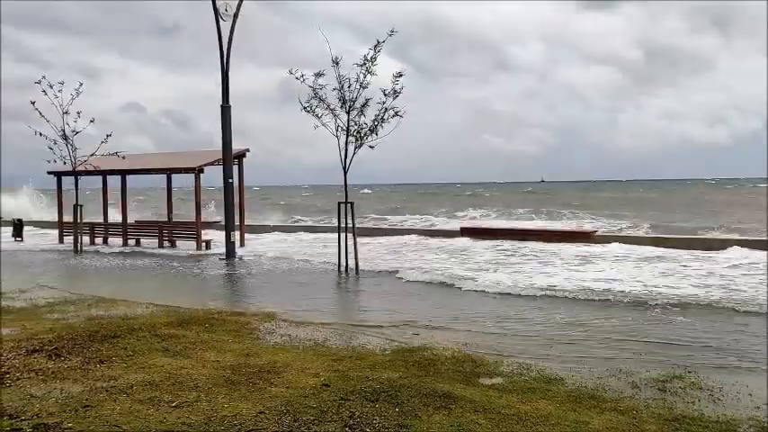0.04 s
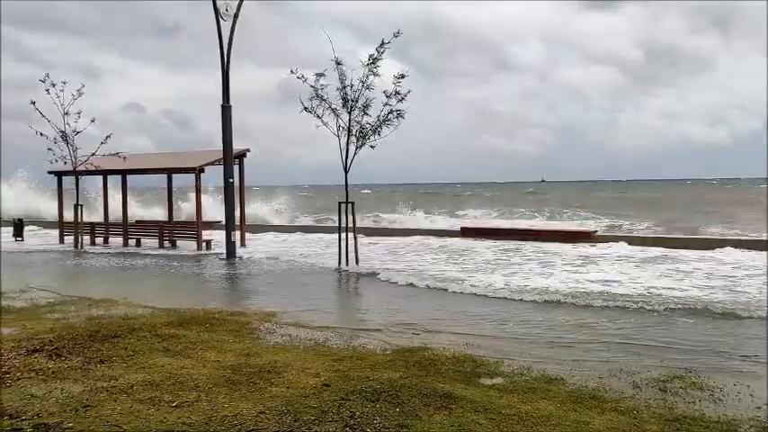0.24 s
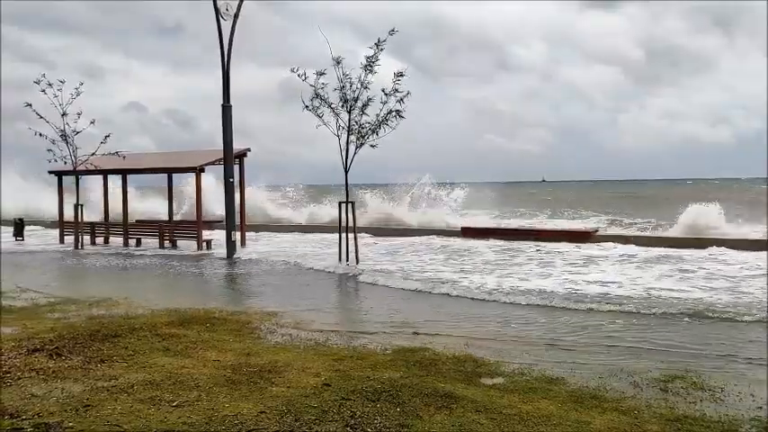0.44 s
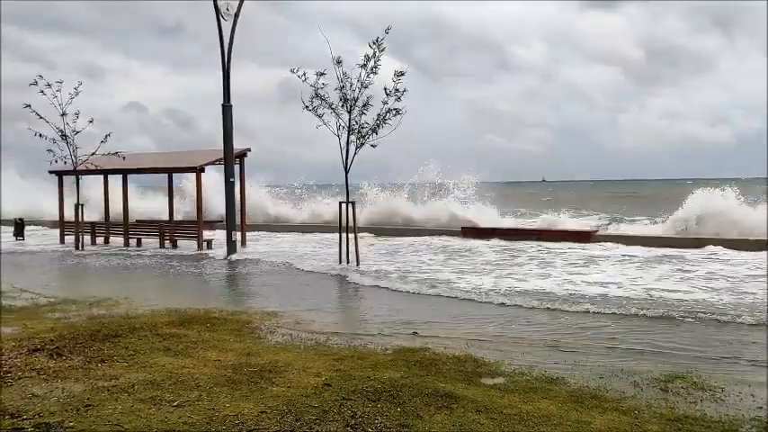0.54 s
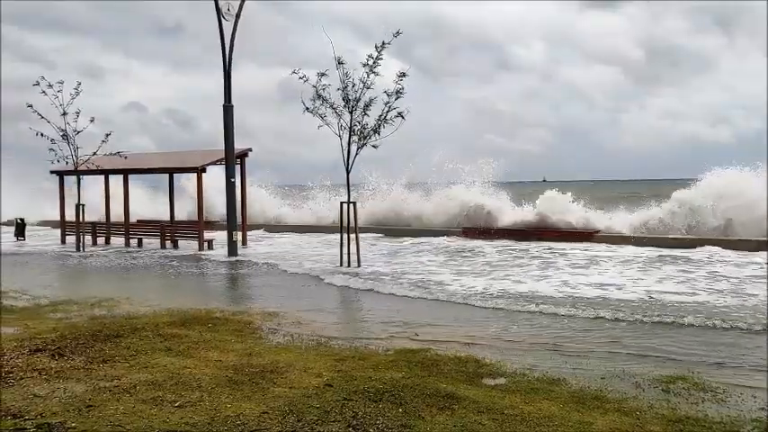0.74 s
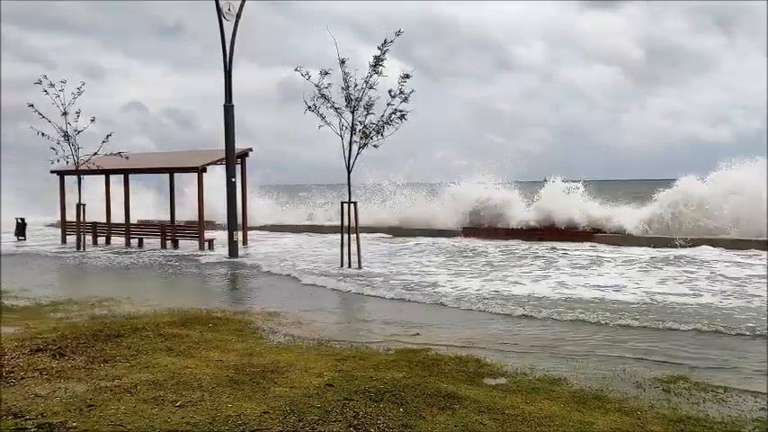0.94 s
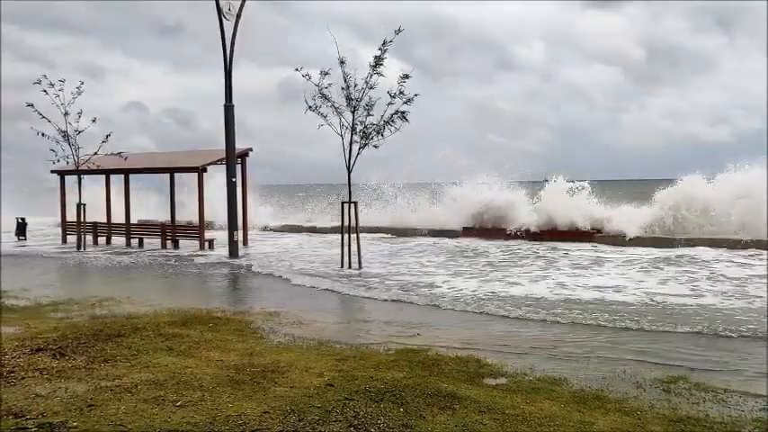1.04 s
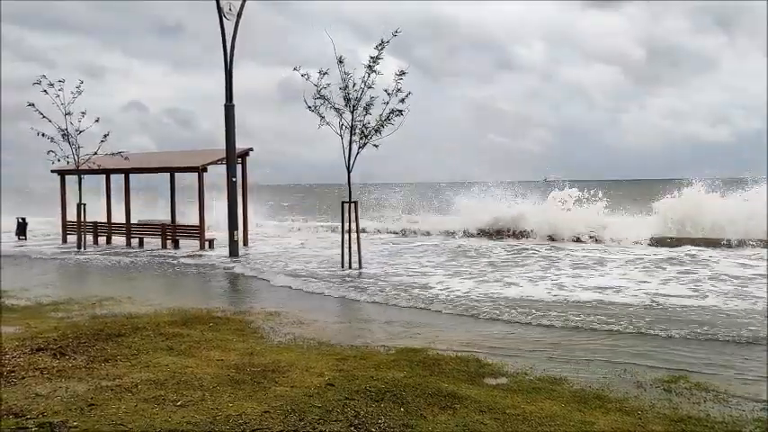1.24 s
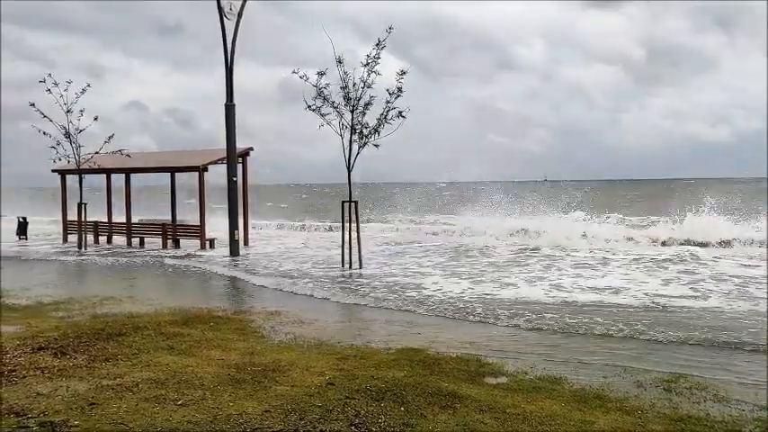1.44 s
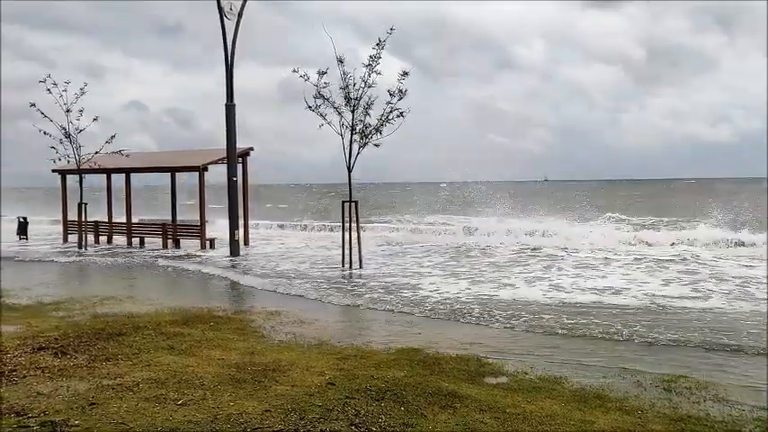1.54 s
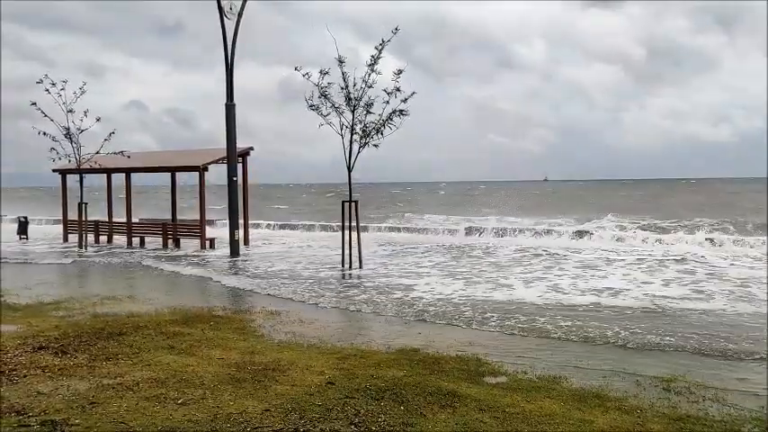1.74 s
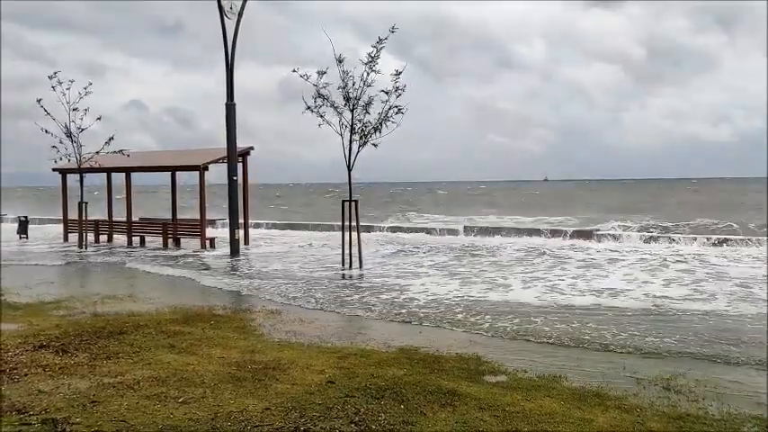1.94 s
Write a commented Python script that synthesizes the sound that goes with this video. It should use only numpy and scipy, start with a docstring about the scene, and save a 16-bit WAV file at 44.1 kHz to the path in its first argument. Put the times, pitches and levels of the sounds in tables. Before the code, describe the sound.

Strong wind buffets and flutters on a stereo microphone, with storm surf hissing behind it

```python
"""Storm surf and wind at two ports

Storm surf washes over a sea wall some way off: shaped noise, a broad hiss that flickers band by band.
It is heard through two microphone ports that each ring in the treble; its level rises and dips.
Gusts drag eddies across each port on its own: a deep noise buffet, a flutter whose pitch rides the
air speed (noise read at a varying rate), and short bright flicks (bursts of sagging sines)."""
import sys
import numpy as np
from scipy import signal
from scipy.fft import rfft, irfft
from scipy.io import wavfile
from scipy.ndimage import uniform_filter1d, map_coordinates

SR = 44100
rng = np.random.default_rng(int(sys.argv[2]) if len(sys.argv) > 2 else 0)


def invert_db(level):
    """Linear amplitude ratio for a level in decibels (20 dB per decade), elementwise."""
    return 10 ** (np.asarray(level, dtype=float) / 20)


def file_out(sig):
    """Save sig as 16-bit WAV at sys.argv[1]."""
    # one column per channel
    cols = np.atleast_2d(sig).T
    # limit, then scale
    lim = np.clip(cols, -1, 1)
    pcm = np.round(lim * 32767).astype(np.int16)
    wavfile.write(sys.argv[1], SR, pcm)


N = 88552


def rms_one(x):
    """Scale to unit rms."""
    return x / np.sqrt(np.mean(x ** 2) + 1e-20)


def in_time(rows):
    """Interpolate the columns after the first (seconds) to one value per sample."""
    s, *columns = np.transpose(rows)
    t = np.arange(N) / SR
    return [np.interp(t, s, column) for column in columns]


def at_hz(spectrum, hz):
    """Read a spectrum on a log-frequency axis."""
    point_hz, point_db = np.transpose(spectrum)
    return np.interp(np.log(hz + 1), np.log(point_hz), point_db)


def coloured(spectrum, size):
    """Noise with the given spectrum, no DC, unit rms."""
    hz = np.arange(size // 2 + 1) * SR / size
    white = rfft(rng.standard_normal(size))
    return rms_one(irfft(white * invert_db(at_hz(spectrum, hz)) * (hz > 0), size))


def drift(corner_hz):
    """Slow random curve of unit rms: noise through two equal low-pass poles."""
    hop, settle = 40, 2000  # samples per slow step, slow steps discarded
    pole = np.exp(-2 * np.pi * corner_hz * hop / SR)
    noise = rng.standard_normal(N // hop + settle + 2)
    slow = signal.lfilter([1], [1, -2 * pole, pole ** 2], noise)[settle:]
    return np.interp(np.arange(N) / hop, np.arange(len(slow)), rms_one(slow - slow.mean()))


def evened(x, span_s):
    """Hold the running rms near 1."""
    size = int(span_s * SR)
    power = uniform_filter1d(uniform_filter1d(x ** 2, size), size)
    return x / np.sqrt(power + 1e-9)


def wind(gust, flick_rows):
    """A frozen train of eddies is carried past the port; harder gusts carry it faster, so it sounds higher."""
    # Eddies at mean air speed. Each row: frequency in Hz, relative density in dB per Hz.
    eddy_spectrum = [(40, -3.5), (100, -8.5), (170, 0), (260, -4), (400, -10.5), (600, -21.5), (1000, -31),
                     (2500, -93)]
    # Deep buffet. Each row: frequency in Hz, relative density in dB per Hz.
    buffet_spectrum = [(20, -6.5), (60, -8.5), (100, -8), (160, -66), (500, -95)]
    mean_gust_db, speed_oct_per_db = -23, 0.0217
    wander_oct, wander_corner_hz, flick_speed_oct = 0.17, 50.2, 0.45
    flutter_trim_db, flutter_even_s = 2.07, 0.085
    buffet_trim_db, buffet_even_s = 0.5, 0.17

    flutter_db, buffet_db = in_time(gust)
    speed_oct = speed_oct_per_db * (flutter_db - mean_gust_db)
    speed_oct = speed_oct + wander_oct * drift(wander_corner_hz)
    speed_oct = speed_oct + flick_speed_oct * surge(flick_rows)
    position = np.cumsum(2 ** np.clip(speed_oct, -2, 2))
    train = coloured(eddy_spectrum, size=2 ** 18)
    eddies = map_coordinates(train, [position], order=3, mode="wrap")
    flutter = invert_db(flutter_db + flutter_trim_db) * evened(eddies, flutter_even_s)

    rumble = coloured(buffet_spectrum, size=2 ** 17)[:N]
    buffet = invert_db(buffet_db + buffet_trim_db) * evened(rumble, buffet_even_s)
    return flutter + buffet


def surge(flick_rows):
    """The air runs faster around each flick: 0 at rest, 1 at a flick."""
    half_width_s = 0.011  # to 1/e
    t = np.arange(N) / SR
    bumps = sum(np.exp(-((t - s) / half_width_s) ** 2) for s, *_ in flick_rows)
    return np.minimum(bumps, 1)


def flicks(rows):
    """Each fast eddy swings at eight sizes at once, small ones weaker and briefer, sagging as the air slows."""
    voices, spread_oct, sag_oct, treble_tilt = 8, 1.0, 0.38, 3
    rise_s, fall_s = 0.0019, 0.00364  # to 1/e for a 1 kHz voice
    lead, tail = 600, 1000  # samples around the peak
    out = np.zeros(N + SR)
    draws = rng.random((len(rows), 2, voices, 1))
    t = np.arange(-lead, tail) / SR
    for (s, db, pitch_hz), (jitter, turn) in zip(rows, draws):
        slot = (np.arange(voices)[:, None] + jitter) / voices
        ratio = 2 ** (spread_oct * (2 * slot - 1))  # voice pitch over flick pitch
        hz = pitch_hz * ratio * 2 ** (-sag_oct * np.tanh(t / fall_s / 2))
        quickness = (ratio * pitch_hz / 1e3) ** 0.7
        shape = np.exp(-(t * quickness / np.where(t < 0, rise_s, fall_s)) ** 2)
        weight = np.minimum(ratio ** -treble_tilt, ratio)
        swings = np.sin(2 * np.pi * (np.cumsum(hz, axis=1) / SR + turn)) * shape * weight
        i = int(s * SR) - lead
        out[i:i + len(t)] += invert_db(db) * swings.sum(axis=0)
    return out[:N]


def wash(level_db, port):
    """Countless bursting bubbles blur to a hiss that flickers band by band and rings in the port."""
    # Surf at the shore. Each row: frequency in Hz, relative density in dB per Hz.
    surf_spectrum = [(150, -6), (500, 14.5), (1200, 4.5), (2500, 2), (4000, -2), (6000, -6.5), (9000, -8),
                     (10000, -18.5), (12000, -20.5), (15000, -28)]
    bands, shared_db, patchy_db = 12, 0.46, 1.46  # flicker rms, common and per band

    hz = np.arange(N // 2 + 1) * SR / N
    ring_hz, width_hz, lift_db = port
    ring = 1 + invert_db(lift_db) / (1 + (2 * (hz - ring_hz) / width_hz) ** 2)
    hiss = rfft(rng.standard_normal(N)) * invert_db(at_hz(surf_spectrum, hz)) * ring
    centres_oct = np.log2(np.geomspace(400, 14000, bands))
    together = drift(27.0)
    out = 0
    for k in range(bands):
        share = np.interp(np.log2(hz + 1), centres_oct, np.arange(bands) == k)
        flicker_db = shared_db * together + patchy_db * drift(7.0)
        out = out + irfft(hiss * share, N) * invert_db(flicker_db)
    treble = irfft(hiss * (hz > 3000), N)  # level reference
    return invert_db(level_db) * out / np.std(treble)


def scene():
    """Each port has its own wind and its own share of the surf."""
    # Gusts at each port. Each row: time in seconds, flutter level in relative dB,
    # deep buffet level in relative dB.
    left_gusts = [(0.0, -22, -27), (0.036, -28, -32), (0.161, -34, -35), (0.279, -18.5, -27),
                  (0.324, -30.5, -32), (0.414, -29, -28), (0.495, -19.5, -29), (0.569, -23, -22),
                  (0.784, -18.5, -23), (0.81, -30, -31), (0.841, -23, -38), (0.878, -32, -39),
                  (0.938, -21, -24.5), (1.023, -17.5, -28), (1.105, -35, -30), (1.177, -24, -39),
                  (1.237, -27, -33.5), (1.27, -18.5, -16), (1.316, -27, -37.5), (1.372, -17.5, -31),
                  (1.551, -22.5, -30), (1.856, -18.5, -27), (2.005, -23, -27.5)]
    right_gusts = [(0.0, -29.5, -29.5), (0.041, -34, -40), (0.242, -22.0, -25.5), (0.327, -40, -40),
                   (0.47, -24, -30), (0.599, -19.0, -34), (0.701, -22, -47), (0.784, -35, -50),
                   (0.813, -27.5, -26), (0.845, -32.5, -49), (0.877, -19, -27), (0.936, -17.0, -23),
                   (1.128, -28.5, -28.5), (1.164, -21.5, -29), (1.201, -31.5, -51), (1.286, -22, -31),
                   (1.323, -30, -29.5), (1.397, -18, -44), (1.489, -28.5, -30), (1.564, -27.5, -22),
                   (1.614, -18, -23.5), (1.735, -32, -32), (1.863, -20, -18), (2.005, -23.5, -29.5)]
    # Brief fast eddies, one list for the left port, one for the right.
    # Each row: peak time in seconds, level in relative dB, pitch in Hz.
    fast_eddies = [
        [(0.653, -19, 900), (0.665, -19, 1160), (0.671, -32, 2820), (0.699, -22, 867), (0.724, -26.5, 1388),
         (0.738, -20, 830), (0.758, -36, 857), (0.778, -28.5, 959), (0.788, -20, 806), (1.393, -24, 896),
         (1.403, -26.5, 997), (1.443, -29, 794), (1.461, -28.5, 1428), (1.474, -23.5, 1093), (1.507, -29, 789),
         (1.61, -23.5, 1003), (1.628, -27, 900), (1.652, -28, 1205), (1.74, -26, 1296), (1.751, -27.5, 1100),
         (1.866, -23.5, 1151), (1.881, -24.5, 909), (1.892, -21.5, 838), (1.943, -27, 859), (1.976, -27, 1890),
         (1.986, -29.5, 1075)],
        [(0.239, -17, 1139), (0.25, -21, 1343), (0.608, -24, 1297), (0.697, -26.5, 1416), (0.706, -21, 1016),
         (0.914, -25, 901), (0.955, -28.5, 1220), (0.963, -24, 797), (0.994, -22.5, 788), (1.158, -37.5, 851),
         (1.392, -14.5, 688), (1.413, -15, 812), (1.44, -26, 1113), (1.606, -31, 914), (1.621, -27, 990),
         (1.635, -26, 1034), (1.654, -24, 1179), (1.722, -28, 992), (1.731, -22, 1495), (1.826, -26, 953),
         (1.837, -28, 955), (1.91, -23.5, 1284), (1.927, -29.5, 1132), (2.001, -15.5, 1245)],
    ]
    # Wash level as heard at each port, with brief dips.
    # Each row: time in seconds, left level in relative dB, right level in relative dB.
    wash_levels = [(0.0, -42.5, -41), (0.21, -42, -39.5), (0.27, -44, -47.5), (0.35, -47, -42),
                   (0.44, -41.5, -38), (0.57, -44, -39.5), (0.62, -45.5, -44), (0.75, -45, -44),
                   (0.859, -45.5, -46), (0.93, -41.5, -39), (1.1, -44, -41), (1.229, -37, -35),
                   (1.291, -40, -34), (1.369, -40.5, -34), (1.449, -42.5, -40), (1.585, -37.5, -31.5),
                   (1.64, -44, -33), (1.68, -42, -40.5), (2.005, -39.5, -35)]
    # Port resonances, left then right. Each row: centre in Hz, width in Hz, added resonance in dB.
    port_rings = [(8850, 1520, 10.5), (7220, 1300, 17.5)]

    ports = zip((left_gusts, right_gusts), fast_eddies, in_time(wash_levels), port_rings)
    return np.array([wind(gust, rows) + flicks(rows) + wash(level_db, ring)
                     for gust, rows, level_db, ring in ports])


def roll_off(x):
    """The treble ends steeply here."""
    return signal.sosfilt(signal.butter(12, 14900, fs=SR, output="sos"), x)


def record(dry):
    """Soft saturation rounds the peaks."""
    mix = 0.67 * np.tanh(dry / 0.71)
    return roll_off(mix)


dry = scene()
out = record(dry)
file_out(out)
```